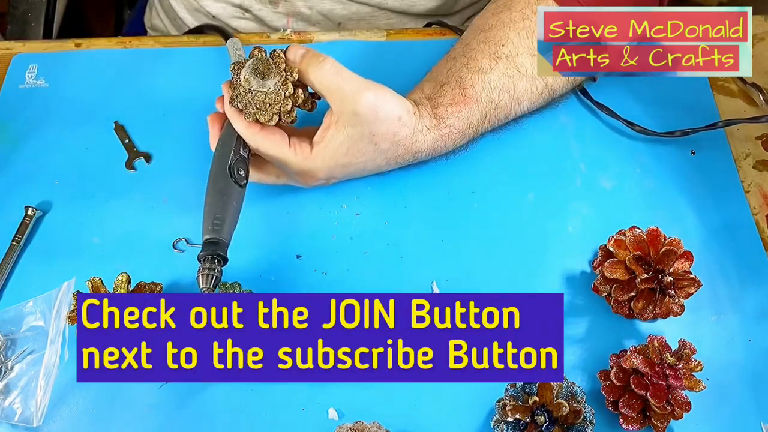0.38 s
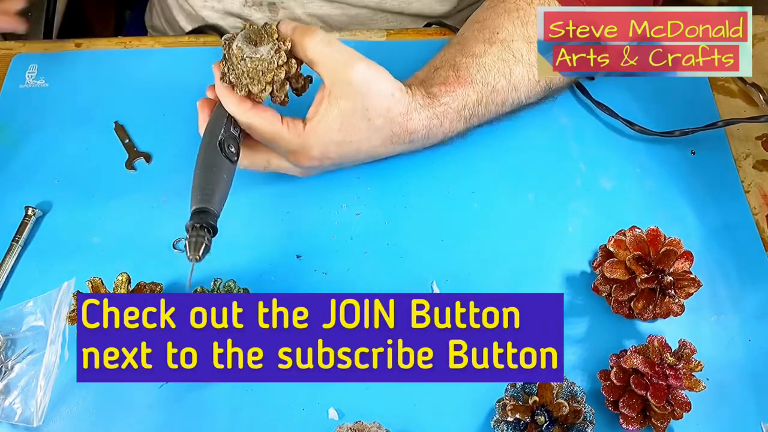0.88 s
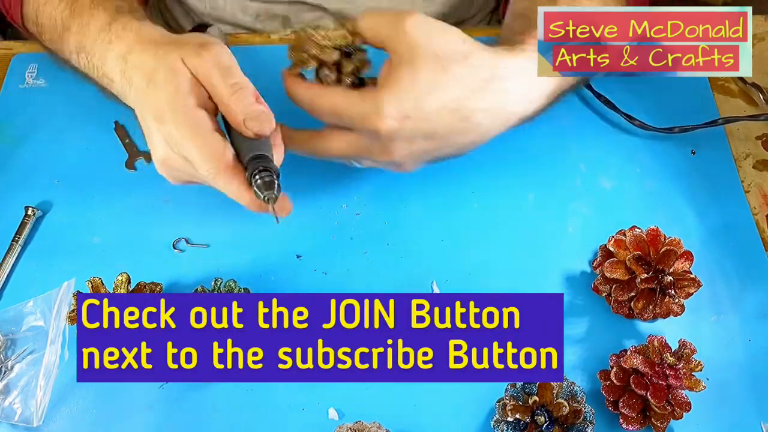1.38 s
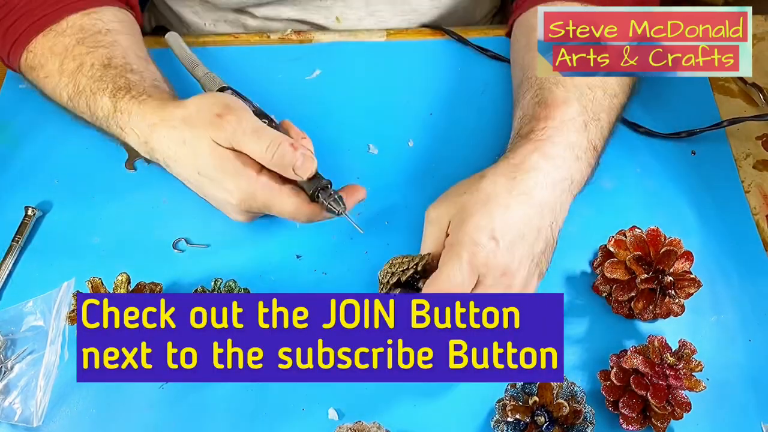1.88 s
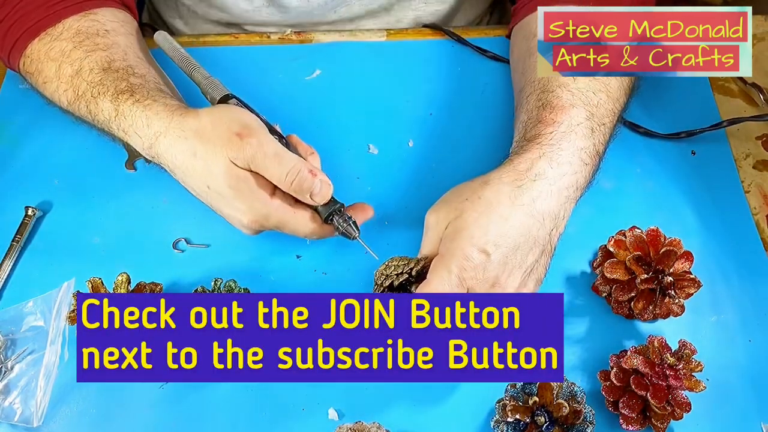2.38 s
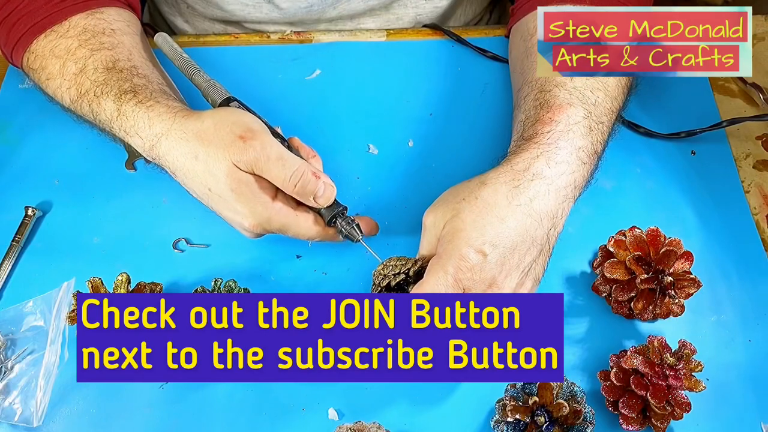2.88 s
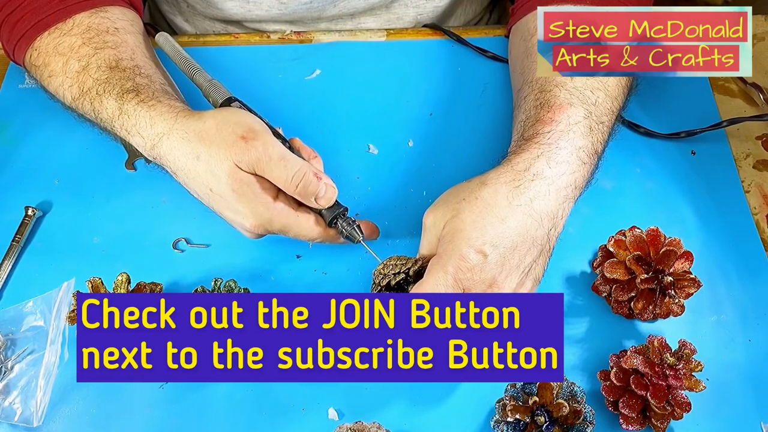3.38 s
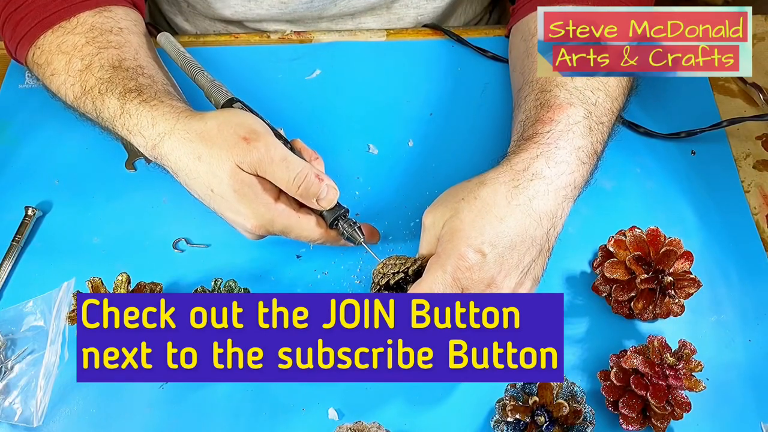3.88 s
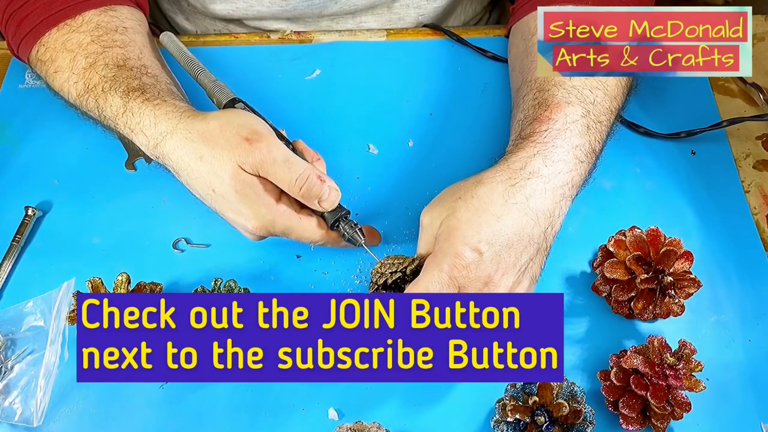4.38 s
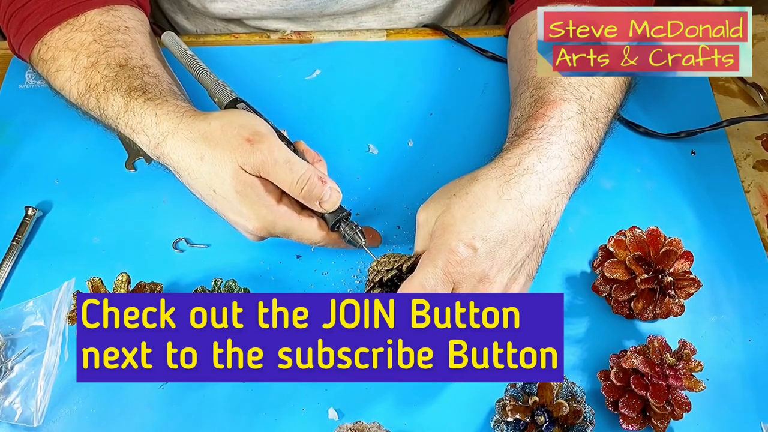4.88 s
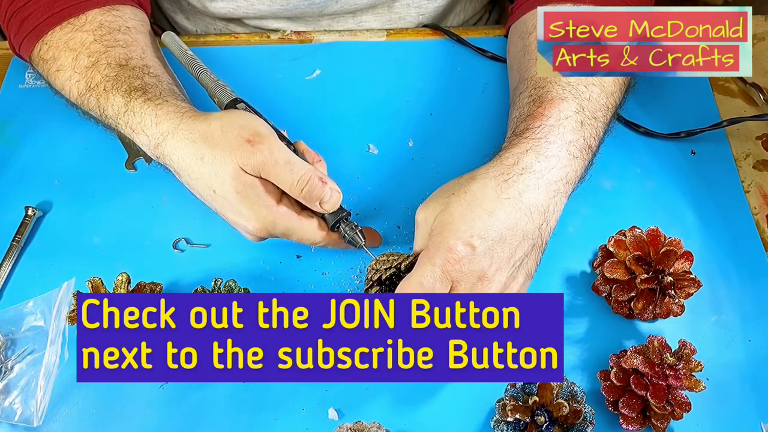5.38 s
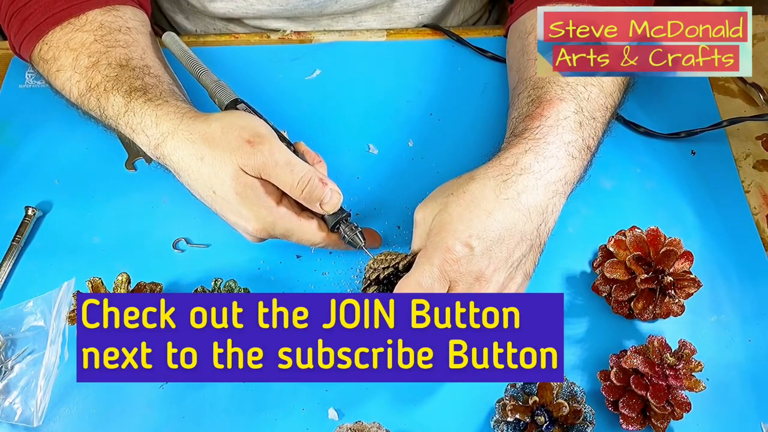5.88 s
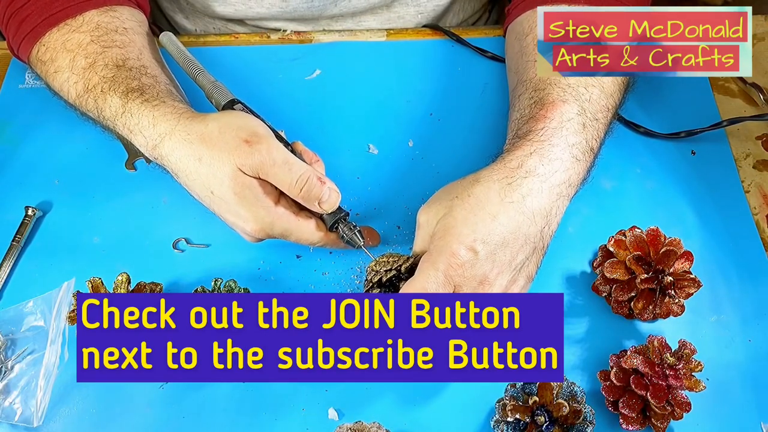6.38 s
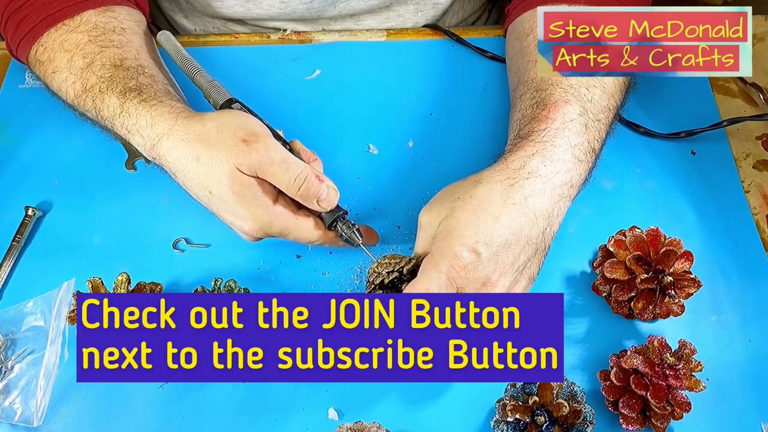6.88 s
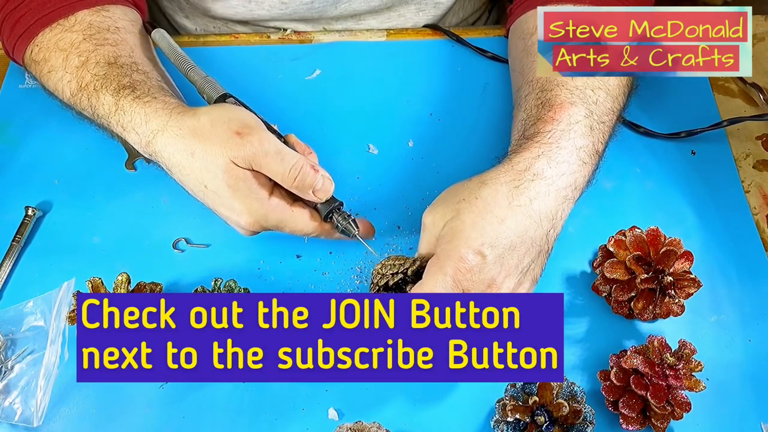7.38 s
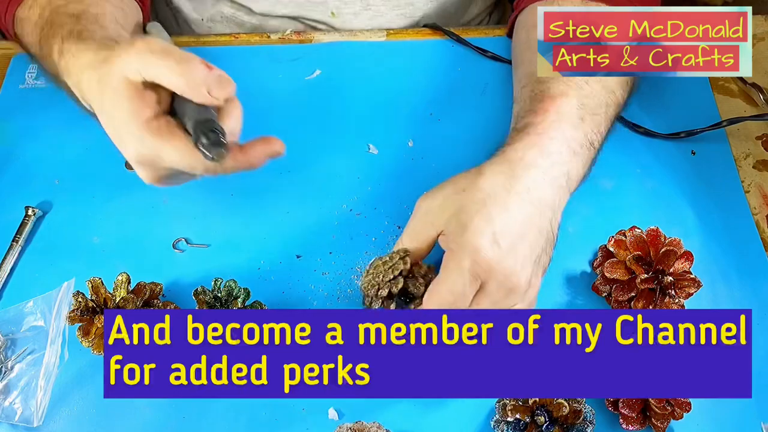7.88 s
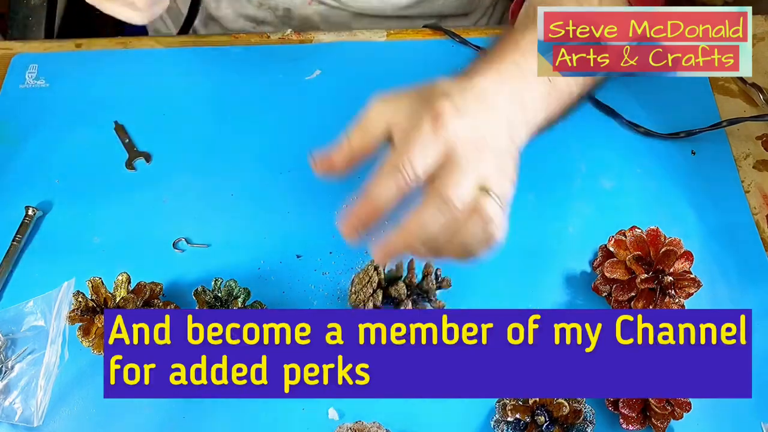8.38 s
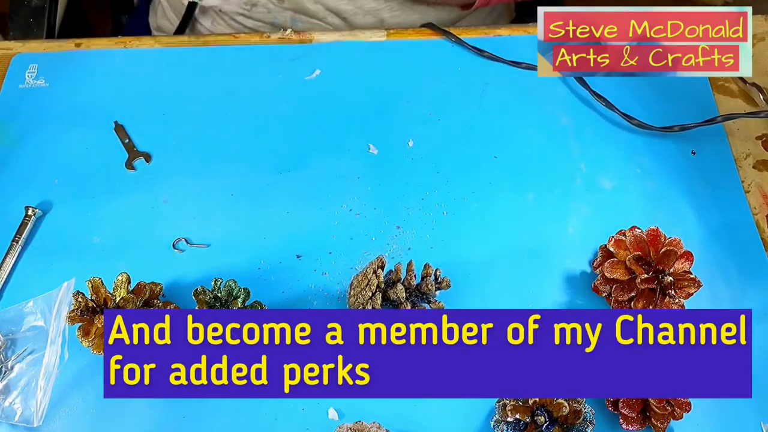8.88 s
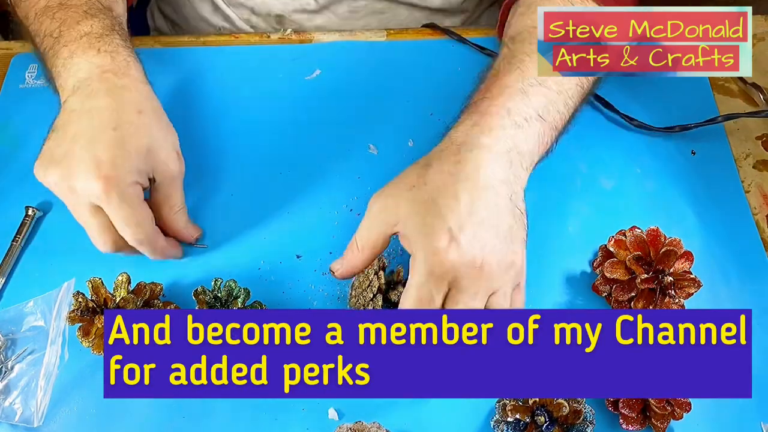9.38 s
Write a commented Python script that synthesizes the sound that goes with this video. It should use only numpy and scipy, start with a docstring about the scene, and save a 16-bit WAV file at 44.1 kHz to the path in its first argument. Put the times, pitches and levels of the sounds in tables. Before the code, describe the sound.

Soft knocks and a switch click, then a small rotary tool whirs up loud, drops in level, drills a pine cone and cuts off abruptly.

```python
"""Rotary tool drilling a pine cone

A hand-held rotary tool is picked up, switched on, runs up and drills into a pine cone on a craft table.
The motor sings as sines on multiples of its shaft speed, with lines spaced by the 100 Hz current pulse.
Shaped noise makes the rush of its fan. The motor sound steps down once at speed and is cut off abruptly.
Noise swells make the hands before and after; knocks, bumps and a quiet room complete the scene."""
import sys
import numpy as np
from scipy import signal
from scipy.fft import rfft, irfft
from scipy.io import wavfile

SR = 44100
rng = np.random.default_rng(int(sys.argv[2]) if len(sys.argv) > 2 else 0)


def ratio(d):
    """dB to gain"""
    e = np.asarray(d, float) / 20
    return 10 ** e


def log_audio(samples):
    """Write samples as a 16-bit WAV file to the path given in sys.argv[1]."""
    # one column per channel
    frames = np.atleast_2d(samples).T
    # limit to full scale, then quantise
    limited = np.clip(frames, -1, 1)
    pcm = np.round(limited * 32767).astype(np.int16)
    wavfile.write(sys.argv[1], SR, pcm)


N = 429534   # length [samples]

START_S, STEP_DOWN_S, CUT_S = .62, 1.3015, 9.2775   # start, step down and cut of the motor sound
HANDS_REST_S = .72   # the hand layers are silent from here until the cut
STEP_DOWN_DB = -16   # the motor's levels below are those after this step down

# Quiet room colour: (frequency [Hz], relative level per Hz [dB])
ROOM_COLOUR = [(120, -44), (200, -15), (500, -25), (773, -15), (848, -1), (991, -15.5), (1630, -6),
               (1990, -19), (3830, -19), (8200, -51), (10700, -72), (18000, -120)]
ROOM_DB = -71
ROOM_HUM_HZ, ROOM_HUM_DB = 60, -66   # drone pitch and average peak level

# Dull bumps through the table: (time [s], relative level [dB], pitch [Hz], 60 dB decay [s])
TABLE_BUMPS = [(0.011, -43.5, 80.7, 0.18), (2.303, -49, 56.5, 0.19), (2.349, -49, 53.73, 0.15),
               (7.839, -62, 88.76, 0.14), (8.361, -43, 40.43, 0.16), (8.409, -42, 86.9, 0.11),
               (9.089, -45.5, 64.6, 0.15), (9.691, -33.5, 67, 0.17)]
# Knocks and switch clicks: (time [s], relative level of body [dB], relative level of snap [dB],
# snap pitch [Hz], snap 60 dB decay [s])
KNOCKS_AND_CLICKS = [(0.081, -33.5, -58, 3390, .017), (.107, -30.5, -52, 3390, .018),
                     (0.179, -56, -55.5, 7220, .02), (.208, -54, -52.5, 2740, .032),
                     (.277, -68, -54, 6010, .024), (.293, -51, -48, 3270, .057),
                     (.39, -63, -52, 3290, .017), (.458, -67, -37.5, 3070, .029),
                     (.5, -77, -45.5, 4300, .026), (0.511, -67, -44.5, 4410, .029),
                     (0.555, -51, -41.5, 7010, .016), (.575, -56, -40.5, 6630, .026),
                     (0.587, -54, -35, 6010, .016), (0.68, -44, -20, 5600, .025)]
# Resonances of the plastic body: (pitch [Hz], relative level [dB], 60 dB decay [s])
BODY_MODES = [(440, 4.5, 0.044), (696, 1, 0.017), (878, -4.5, 0.045), (1195, -10, 0.045), (1660, -26, .03)]

# Colours of the handling layers: (frequency [Hz], relative level per Hz [dB])
RUMBLE_COLOUR = [(15, -42), (25, -21.5), (70, 7), (108, -4.5), (194, -7), (227, -9), (254, -17.5),
                 (300, -16), (390, -32), (660, -120)]
RUSTLE_COLOUR = [(150, -10.5), (250, -16), (329, -14), (440, -4.5), (563, -11), (858, -6.5), (963, -11),
                 (1650, -8.5), (8000, -29), (10400, -101), (17600, -120)]
HISS_COLOUR = [(3000, -14.5), (4700, -26), (5300, -2.5), (7700, 0.5), (8300, -11), (8700, -58), (9900, -58),
               (10300, -7.5), (12000, -4), (14500, -30), (15300, -62.5)]
# Handling rumble over time: (time [s], relative level [dB])
RUMBLE_LEVELS = [(0, -54), (.05, -47), (.08, -50), (.09, -53), (.2, -43), (.28, -60), (.31, -42.5),
                 (.39, -67), (.41, -62), (.54, -67), (.55, -52), (.586, -36.5), (.66, -51), (.72, -43),
                 (9.285, -84), (9.575, -64.5), (9.585, -53), (9.74, -48)]
# Sleeves and fingers brush past: (time [s], rise [s], relative peak level [dB], 60 dB decay [s])
BRUSHES = [(0, 0.0016, -45, 0.19), (.083, 0.0024, -38.5, 0.25), (.285, 0.022, -50, 0.11),
           (.395, 0.012, -66.5, 1.5), (.45, .09, -56.5, 1.5), (.543, .015, -60, 1.5),
           (.588, 0.0063, -54.5, 1.5), (.67, 0.035, -46, 1.5), (9.58, 0.0088, -54, 1),
           (9.61, 0.034, -44.5, 0.36), (9.68, 0.0098, -57, 0.35)]
# Bright hisses, loudest from the sliding switch: (time [s], rise [s], relative peak level [dB],
# 60 dB decay [s])
BRIGHT_HISSES = [(0, 0.0018, -62, 0.37), (.275, .005, -66, 0.14), (.395, 0.4, -53.5, .3),
                 (.55, .01, -60, .6), (.588, 0.0055, -36, 0.52), (.6, .048, -29.5, .04),
                 (.67, .006, -35, 0.069), (9.59, 0.065, -70.5, 0.27)]
RUSTLE_FLOOR_DB, HISS_FLOOR_DB = -76.5, -87   # relative levels

# Fan rush in the sum and in the difference of the two microphones:
# (frequency [Hz], relative level per Hz [dB])
RUSH_SUM_COLOUR = [(35, -28.5), (70, -18), (250, -28.5), (600, -21), (1100, -16), (1700, -17.5),
                   (2150, -10.5), (2700, -12.5), (3400, -15), (6560, -14.5), (8200, -20.5), (8600, -53.5),
                   (9900, -38), (10400, -26.5), (13800, -28), (14700, -46)]
RUSH_DIFFERENCE_COLOUR = [(35, -46), (70, -29), (250, -35), (700, -7.5), (1640, -8), (2400, -2.5),
                          (3440, -18), (6000, -21), (8000, -2.5), (10800, -21.5), (11500, -38),
                          (13300, -53), (14000, -16.5), (15700, -29)]
CHATTER_DB, FAN_DB, HISS_DB = -58.5, -54, -57.5   # relative levels at usual speed
# The bit bites or the shaft rattles: (time [s], length [s], added to chatter [dB],
# added to fan band [dB], added to top hiss [dB])
BIT_BITES = [(2.0, .5, 2, -0.5, 0), (7.81, 0.319, 1.5, 0.5, 0.5), (8.328, 0.34, 2, 0.5, 1),
             (6.34, 0.37, 0.5, -0.5, 0.5), (3.2, 0.24, 2.5, 0.5, 0), (3.62, 0.16, -0.5, 1, -0.5),
             (4.573, .1, -1, 2, 1.5), (5.6, 0.065, -3.5, 1, -0.5), (6.703, 0.39, 3.5, 2, 5),
             (6.812, 0.0489, -3, 1, 1.5), (7.106, .12, 6, 1.5, 1.5)]
BITE_EDGE_S = 0.016

# Motor course: (time [s], shaft speed [Hz], strain [0-1], high whine over its usual level [dB])
MOTOR_COURSE = [(.62, 90.6, 0.8, -14), (.645, 123.2, 0.86, 3), (.69, 139, 1, 16), (.735, 183.8, 1, -15),
                (.77, 213.9, 0.96, 6), (.81, 259.4, 0.85, -4), (.86, 313.7, 0.92, -2.5),
                (.89, 340, 0.95, -5.5), (.93, 352.6, 0.94, -7), (1.0, 350.4, .5, 0),
                (1.15, 340, 0.33, -10.5), (1.31, 335.4, 0.3, -15), (1.5, 338.2, 0.26, -1),
                (1.73, 334.8, 0.16, 1.5), (2.0, 337, 0.24, -0.5), (3.3, 334.9, 0.38, 0.5),
                (3.85, 332.8, 0.56, 2), (4.2, 332.5, 0.47, 2), (4.4, 329, 0.62, 0.5),
                (4.55, 331.5, 0.65, 1.5), (5.15, 330.8, 0.62, 0.5), (5.3, 329.3, 0.72, 3.5),
                (5.6, 329, 0.8, 1), (5.8, 326.7, 0.7, 0), (6.05, 330.5, 0.64, 2), (6.5, 334, 0.49, 2),
                (6.95, 335.8, 0.54, 1.5), (7.25, 339.6, 0.5, -5.5), (7.5, 336, 0.12, -3.5),
                (7.75, 338.3, 0.12, -2.5), (8.5, 339.2, 0, -2), (8.85, 336.5, 0, -13), (9.27, 338.2, 0, -6)]
# Strain of running free, touching, drilling, running up: (strain [0-1])
STRAIN_STEPS = (0, 1 / 3, 2 / 3, 1)
# Shaft multiple: (level at each strain step [dB]), at usual speed
SHAFT_LEVELS = {1: (-58, -57, -59, -58.5), 2: (-70.5, -72.5, -60, -68.5), 3: (-57, -61, -65, -73.5),
                4: (-69, -65, -59.5, -68.5), 5: (-74.5, -70.5, -59.5, -72), 6: (-75, -64.5, -63, -76.5),
                7: (-63, -63.5, -56, -62), 12: (-62, -56, -58.5, -71), 16: (-66.5, -70.5, -68, -64.5),
                24: (-55, -51, -52.5, -53)}
# Shaft multiple: share of the whine's swing [0-1]
WHINE_SHARES = {12: 0.14, 24: 1}
# Lines the current pulse sets beside a shaft multiple:
# multiple: (one pulse step below, over the multiple [dB], one pulse step above, over the multiple [dB])
PULSE_SIDE_LINES = {1: (-25.5, -13), 4: (-21.5, -18), 16: (-19.5, -16.5), 24: (-30, -26)}
# Weaker shaft multiples: (multiple, level over the fan's setting [dB])
FAINT_MULTIPLES = [(9, -12), (10, -15), (11, -20), (13, -17.5), (14, -13.5), (15, -18), (17, -19.5),
                   (18, -15.5), (20, -15.5)]
# Eight armature slots, split by the pulsing current:
# pulse steps from the slot tone: (level at each strain step [dB]), at usual speed
SLOT_LEVELS = {-3: (-55, -78, -58, -69.5), -2: (-54, -56, -61, -48.5), -1: (-64, -57, -53.5, -58),
               0: (-58, -57, -60.5, -48), 1: (-75, -73.5, -52.5, -59), 2: (-60.5, -57, -61, -55.5),
               3: (-62, -65.5, -63.5, -64.5)}
# One multiple sings out for a while: (time [s], length [s], multiple, level [dB])
SONGS = [(0.927, .35, 2, -63.5), (0.944, 0.072, 3, -64), (1.411, 0.22, 5, -51.5), (1.774, .17, 5, -50.5),
         (1.98, 0.69, 5, -59.5), (2.197, 1.1, 4, -58), (2.593, .17, 5, -61.5), (2.829, 0.11, 5, -54.5),
         (3.096, 0.15, 5, -57.5), (3.67, 0.67, 4, -58), (3.708, 0.04, 6, -55), (4.595, 0.54, 6, -50.5),
         (5.151, 0.47, 6, -55), (5.3, 0.18, 4, -54.5), (5.567, 0.55, 5, -54.5), (5.58, 0.35, 16, -59.5),
         (5.799, 0.172, 4, -56), (6.017, 0.18, 6, -49), (6.196, 0.5, 5, -49.5), (6.747, 0.367, 5, -56.5),
         (6.209, 0.77, 3, -57.5), (6.627, 0.23, 6, -55), (7.044, 0.14, 6, -51), (7.257, 0.54, 5, -50),
         (7.853, 0.36, 6, -59), (8.796, .25, 5, -62.5)]
# Pitches the casing favours as lines sweep through: (frequency [Hz], relative level [dB])
CASING_RESPONSE = [(100, -11.5), (800, -2), (1400, -5), (1900, 4), (2150, 4.5), (2450, 17.5), (2720, 5),
                   (2950, 5), (3300, -13.5), (4000, -1), (5400, -13.5), (6800, 0.5), (8500, -2)]
# Motor tones between the microphones: (frequency [Hz], difference over sum [dB], phase lead [rad])
STEREO_SPREAD = [(100, -11.5, .5), (340, -5.5, 2), (680, -7, 0.76), (1000, 4, 1.63), (1350, -7.5, 2.06),
                 (1680, -12.5, 0), (1986, -10, 2.1), (2350, 0.5, -2.5), (2480, -2.5, -1.5),
                 (2590, 0.5, -1.5), (2690, -1.5, -2), (2850, -4, -1), (3400, -7, -10), (4050, -4.5, -17),
                 (8000, 4, 1.24)]

PULSE_HZ, PULSE_DB = 100, -16   # current pulse at twice the mains rate; hum over the fan's setting
USUAL_HZ, SETTLED_HZ = 336, 338   # shaft speeds
LINES_DB_PER_OCTAVE, FAN_DB_PER_OCTAVE = 11, 8   # growth with speed
RACING_DB_PER_HZ = -.6   # some multiples thin out above the settled speed
SING_EDGE_SHARE, SING_WAVER_DB = .3, 2.5   # each edge as a share of the song; spread of its level
FLARE = 1.14   # extra dB on the weaker multiples for each dB a bite adds to the fan band
JITTER = .0002   # unsteadiness of the speed, as a share
JUDDER_RAD, JUDDER_HZ, ROUGH_FLUTTER_DB = .055, 90, 3.5   # rough running under high strain


def seconds():
    """Time of every sample."""
    return np.arange(N) / SR


def rms_one(x):
    """Scales to an rms of one."""
    return x / np.sqrt(np.mean(x ** 2) + 1e-20)


def in_time(rows):
    """Draws straight automation lines through the timed rows, one for each further column."""
    times, *columns = np.transpose(rows)
    return np.array([np.interp(seconds(), times, column) for column in columns])


def at_hz(points, hz, axis=1):
    """Reads one column of a spectrum along a logarithmic frequency scale."""
    points = np.array(points)
    return np.interp(np.log(hz + 1), np.log(points[:, 0] + 1), points[:, axis])


def drift(rate):
    """Slow chance of spread 1, with new values about rate times a second."""
    knot_rate = 40
    knots = rng.standard_normal(int(N / SR * knot_rate) + 202)
    smoothing = np.exp(-2 * np.pi * rate / knot_rate)
    slow = signal.lfilter([1], [1, -smoothing], knots)[200:]   # skip the filter's settling
    return np.interp(seconds() * knot_rate, np.arange(len(slow)), rms_one(slow))


def coloured(white, spectrum, low_hz, high_hz, turn=1):
    """Noise given a spectrum, rms 1 between two frequencies; turn=1j shifts it a quarter cycle."""
    hz = np.arange(N // 2 + 1) * SR / N
    bins = rfft(white) * ratio(at_hz(spectrum, hz))
    in_band = (hz > low_hz) & (hz < high_hz)
    power = 2 * np.sum(np.abs(bins[in_band]) ** 2) / N ** 2
    return irfft(turn * bins, N) / np.sqrt(power)


def wide_noise(spectrum, low_hz, high_hz, side_db):
    """Stereo noise from independent sum and difference signals of the same colour."""
    mid, side = (coloured(rng.standard_normal(N), spectrum, low_hz, high_hz) for _ in range(2))
    return mid + ratio(side_db) * side * [[1], [-1]]


def between(start_s, stop_s):
    """One inside the span, with edges of a millisecond."""
    t = seconds()
    return np.clip(np.minimum(t - start_s, stop_s - t) * 1000 + .5, 0, 1)


def held(start_s, length_s, edge_s):
    """Rises, holds at one and falls; the edges are centred on start and end."""
    edge_s = min(edge_s, length_s)
    half = edge_s / 2
    corners = start_s + np.array([-half, half, length_s - half, length_s + half])
    return np.interp(seconds(), corners, [0, 1, 1, 0])


def swells(rows, floor_db):
    """Level in dB of sounds that each rise and die away, their powers added over a floor."""
    t, power = np.arange(0, N / SR, .001), ratio(2 * floor_db)
    for start_s, rise_s, db, t60 in rows:
        rise = np.clip((t - start_s) / max(rise_s, .001), 0, 1)
        fall_db = -60 * np.maximum(t - start_s - rise_s, 0) / t60
        power = power + (rise * ratio(db + fall_db)) ** 2
    return np.interp(seconds(), t, 10 * np.log10(power))


def room():
    """A low sine drone and the room's noise hush, heard once the motor sound is cut."""
    drone = ratio(ROOM_HUM_DB + 2.0 * drift(8.0)) * np.sin(2 * np.pi * ROOM_HUM_HZ * seconds())
    hush = ratio(ROOM_DB) * wide_noise(ROOM_COLOUR, 300, 3500, -6)
    return (drone + hush) * between(CUT_S, N / SR + 1)


def bumps():
    """A soft push through the table: a low sine that swells for about a cycle and dies."""
    out, t = np.zeros(N), seconds()
    for start_s, db, hz, t60 in TABLE_BUMPS:
        since = np.maximum(t - start_s, 0)
        swell = 1 - np.exp(-since * hz)
        out += ratio(db + 3.0 - 60 * since / t60) * swell * np.sin(2 * np.pi * hz * since)
    return out


def ring(clicks, hz, t60):
    """A two-pole resonator: a unit click sets a sine of height about 1 ringing."""
    r, w = ratio(-60 / (t60 * SR)), 2 * np.pi * hz / SR
    return signal.lfilter([0, np.sin(w)], [1, -2 * r * np.cos(w), r * r], clicks + 1e-18)


def knocks():
    """Each knock rings the plastic body with its own strengths and throws a snap of noise around a pitch."""
    out, t = np.zeros((2, N)), seconds()
    white = rng.standard_normal((2, N))
    strengths_db = rng.normal(0, 2.9, (len(KNOCKS_AND_CLICKS), len(BODY_MODES)))
    for (start_s, body_db, snap_db, snap_hz, t60), chance_db in zip(KNOCKS_AND_CLICKS, strengths_db):
        at = slice(round(start_s * SR), round((start_s + .25) * SR))
        since = t[at] - start_s
        click = white[0, at] * np.exp(-since / 0.013)   # a soft, grainy contact
        body = sum(ratio(mode_db + luck_db) * ring(click, hz, ring_s)
                   for (hz, mode_db, ring_s), luck_db in zip(BODY_MODES, chance_db))
        out[:, at] += ratio(body_db - 29.5) * body
        band = signal.butter(1, [snap_hz * 0.81, snap_hz * 1.16], "band", fs=SR, output="sos")
        high = signal.butter(2, snap_hz * 0.41, "high", fs=SR, output="sos")
        snap = 2.6 * signal.sosfilt(band, white[:, at]) + 0.26 * signal.sosfilt(high, white[:, at])
        out[:, at] += ratio(snap_db - 60 * since / max(t60, .005)) * snap
    return out


def hands():
    """Handling as three noise layers: rumble, rustle and the hiss of the sliding switch."""
    rumble_db, = in_time(RUMBLE_LEVELS)
    layers = [(rumble_db, RUMBLE_COLOUR, 30, 250, -14),
              (swells(BRUSHES, RUSTLE_FLOOR_DB), RUSTLE_COLOUR, 300, 3500, -5.0),
              (swells(BRIGHT_HISSES, HISS_FLOOR_DB), HISS_COLOUR, 4500, 8000, -1.5)]
    out = np.zeros((2, N))
    for db, spectrum, low_hz, high_hz, side_db in layers:
        noise = wide_noise(spectrum, low_hz, high_hz, side_db)
        out += ratio(db - 4.5 + 3.1 * drift(20)) * noise
    return out * (1 - between(HANDS_REST_S, CUT_S))


def tone(phase, level_db, hz, waver_db):
    """One line; the two microphones hear it with a lag and balance that wander slowly by chance."""
    height = np.sqrt(2) * ratio(level_db + waver_db * drift(12.0))
    lead = at_hz(STEREO_SPREAD, hz, axis=2) + .3 * drift(.5)
    side = ratio(at_hz(STEREO_SPREAD, hz) + 1.5 * drift(.8)) * np.sin(phase + lead)
    return height * (np.sin(phase) + side * [[1], [-1]])


def rush(shaft_hz, chatter_db, fan_db, hiss_db):
    """Fan and brush noise, throbbing with the current and each turn; the chatter's level wavers."""
    shared, own = rng.standard_normal((2, N))
    total = coloured(shared, RUSH_SUM_COLOUR, 4470, 7250)
    # spaced microphones: most of the difference is the same noise a quarter cycle on
    apart = ratio(-8.0) * coloured(shared + .6 * own, RUSH_DIFFERENCE_COLOUR, 4300, 7600, turn=1j)
    both = total + apart * [[1], [-1]]
    top = signal.sosfiltfilt(signal.butter(4, 9500, "high", fs=SR, output="sos"), both)
    low = signal.sosfiltfilt(signal.butter(2, [1300, 4200], "band", fs=SR, output="sos"), both)

    angle = 2 * np.pi * np.cumsum(shaft_hz) / SR
    turn = np.cos(angle)
    throb = 1 + 0.017 * np.cos(2 * np.pi * PULSE_HZ * seconds())
    throb *= 1 + 0.088 * turn
    hiss_over_fan_db = hiss_db - fan_db
    top *= 1.5 + np.clip(0.067 * (hiss_over_fan_db + 8.0), 0, .9) * turn   # a biting bit hisses once a turn
    for k in range(32, 38):   # high shaft multiples that whistle with the hiss
        top = top + tone(k * angle, -25 + .5 * hiss_over_fan_db, 11500, 5)
    middle = both - top - low   # the whole rush less the throbbing, whistling top and the low band
    chatter = ratio(chatter_db + 2.0 + 1.2 * drift(15)) * low
    return throb * (chatter + ratio(fan_db - 2.2) * middle + ratio(hiss_db + 8.5) * top)


def line_level(levels_db, k, step, shaft_hz, strain):
    """A line's level follows the strain, grows with speed and passes through the casing's resonances."""
    now_hz = np.maximum(k * shaft_hz + step * PULSE_HZ, 1)
    casing_db = at_hz(CASING_RESPONSE, now_hz) - at_hz(CASING_RESPONSE, k * USUAL_HZ + step * PULSE_HZ)
    speed_db = LINES_DB_PER_OCTAVE * np.log2(shaft_hz / USUAL_HZ)
    return np.interp(strain, STRAIN_STEPS, levels_db) + casing_db + speed_db


def shaft_angle(shaft_hz, surge):
    """The shaft's phase in radians: summed unsteady speed, shaken by low noise under high strain."""
    angle = 2 * np.pi * np.cumsum(shaft_hz * (1 + JITTER * drift(12))) / SR
    lowpass = signal.butter(2, JUDDER_HZ, fs=SR, output="sos")
    shake = signal.sosfilt(lowpass, rng.standard_normal(N))
    return angle + JUDDER_RAD * surge * rms_one(shake)


def with_songs(k, db):
    """Lifts a multiple to its song's wavering level wherever that is the louder."""
    song = sum(ratio(song_db) * held(start_s, length_s, SING_EDGE_SHARE * length_s)
               for start_s, length_s, multiple, song_db in SONGS if multiple == k)
    return 20 * np.log10(np.maximum(ratio(db), song * ratio(SING_WAVER_DB * drift(4))))


def motor_tones(shaft_hz, strain, whine_db, fan_db, bite_db):
    """Shaft multiples, the slot tone chopped by the current, and the current's own hum."""
    surge = np.clip((strain - STRAIN_STEPS[2]) / (1 - STRAIN_STEPS[2]), 0, 1)   # high strain runs rough
    angle = shaft_angle(shaft_hz, surge)
    pulse = 2 * np.pi * PULSE_HZ * seconds()
    out = tone(pulse, fan_db + PULSE_DB, PULSE_HZ, 0.78)
    for k, levels_db in SHAFT_LEVELS.items():
        db = line_level(levels_db, k, 0, shaft_hz, strain) + WHINE_SHARES.get(k, 0) * whine_db
        if 2 < k < 7 or k in (12, 16):
            db = db + RACING_DB_PER_HZ * np.maximum(shaft_hz - SETTLED_HZ, 0)
        db = with_songs(k, db)
        # the middle multiples flicker in level whatever the strain, the others more as it surges
        flicker_db = 2.2 if 3 < k < 8 else 1.4 + ROUGH_FLUTTER_DB * surge
        out += tone(k * angle, db, k * USUAL_HZ, flicker_db)
        for step, beside_db in zip((-1, 1), PULSE_SIDE_LINES.get(k, ())):
            out += tone(k * angle + step * pulse, db + beside_db, k * USUAL_HZ, 1.5)
    for k, db in FAINT_MULTIPLES:
        start_phase = rng.uniform(0, 2 * np.pi)
        out += tone(k * angle + start_phase, fan_db + FLARE * bite_db + db, k * USUAL_HZ, 4.47)
    for step, levels_db in SLOT_LEVELS.items():
        offset = 0.25 * step ** 2   # fixed phases that make each burst glide in pitch
        # the casing is read a little above the eighth multiple; each line's level drifts slowly by chance
        db = line_level(levels_db, 8.16, step, shaft_hz, strain) + 2.0 * drift(0.5)
        phase = 8 * angle + step * pulse + offset
        out += tone(phase, db, 8 * USUAL_HZ + step * PULSE_HZ, 1.0 + 2.0 * surge)
    return out


def motor():
    """Tones and rush share one course of speed and bites, step down in level and are cut off abruptly."""
    shaft_hz, strain, whine_db = in_time(MOTOR_COURSE)
    bites_db = sum(np.outer(added_db, held(start_s, length_s, BITE_EDGE_S))
                   for start_s, length_s, *added_db in BIT_BITES)
    speed_db = FAN_DB_PER_OCTAVE * np.log2(shaft_hz / USUAL_HZ)
    noise_db = np.c_[[CHATTER_DB, FAN_DB, HISS_DB]] + bites_db + speed_db
    tones = motor_tones(shaft_hz, strain, whine_db, noise_db[1], bites_db[1])
    sound = tones + rush(shaft_hz, *noise_db)
    gain = np.where(np.arange(N) < STEP_DOWN_S * SR, ratio(-STEP_DOWN_DB), 1)
    return sound * gain * between(START_S, CUT_S)


def scene():
    """Mixes the motor, the room, the hands and the table."""
    return motor() + room() + hands() + knocks() + bumps()


def top_cut(x):
    """Nothing passes above the cut-off."""
    return signal.sosfilt(signal.butter(12, 15790, fs=SR, output="sos"), x)


def record(dry):
    """Delivers the finished mix."""
    return top_cut(dry)


dry = scene()
out = record(dry)
log_audio(out)
```